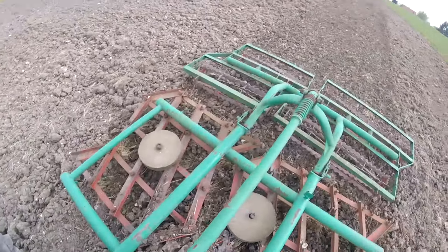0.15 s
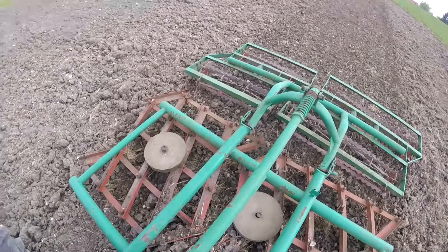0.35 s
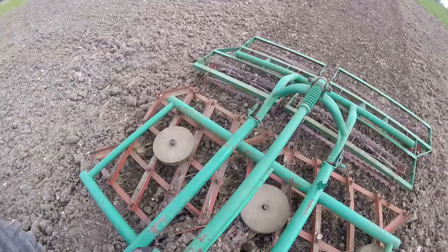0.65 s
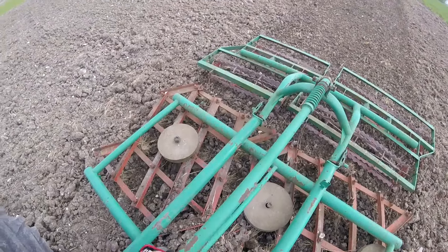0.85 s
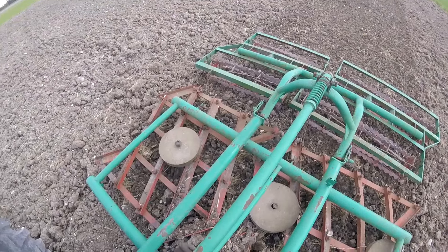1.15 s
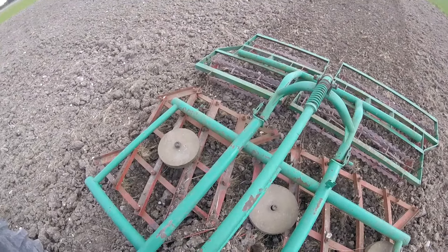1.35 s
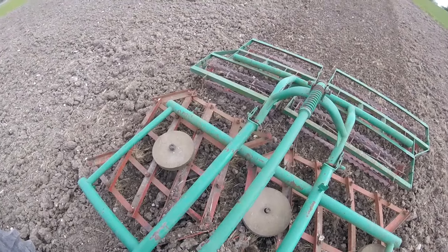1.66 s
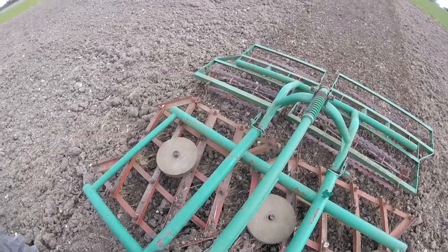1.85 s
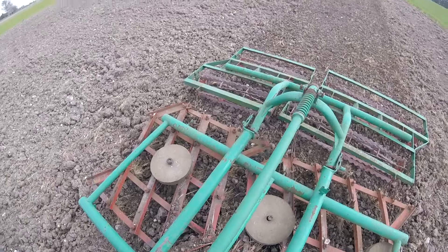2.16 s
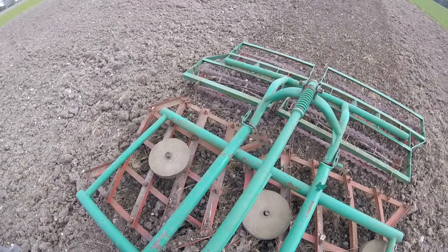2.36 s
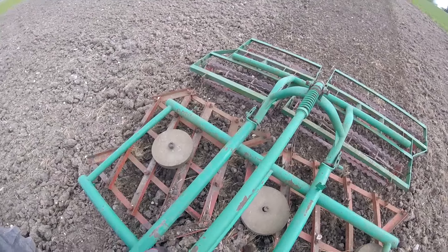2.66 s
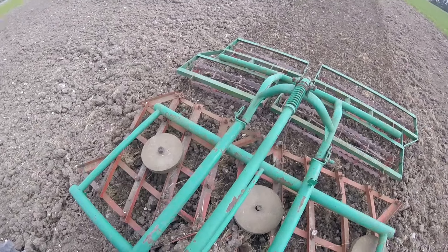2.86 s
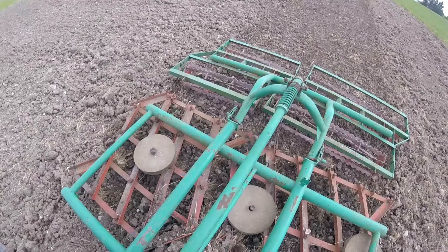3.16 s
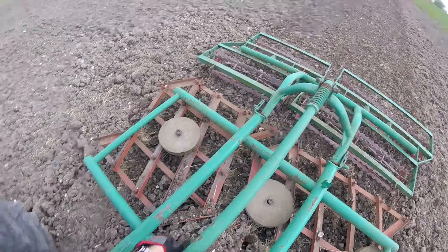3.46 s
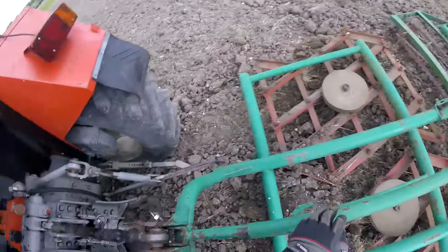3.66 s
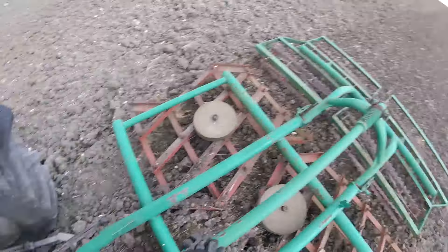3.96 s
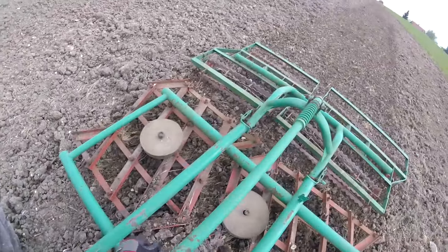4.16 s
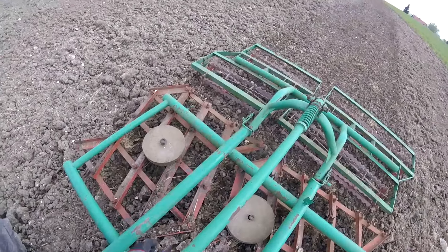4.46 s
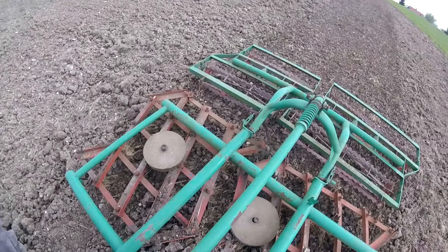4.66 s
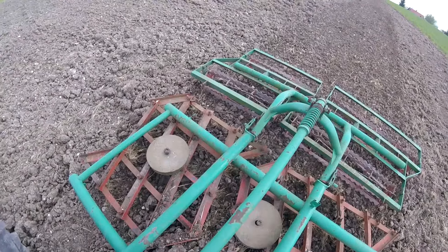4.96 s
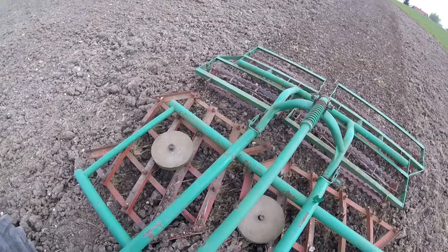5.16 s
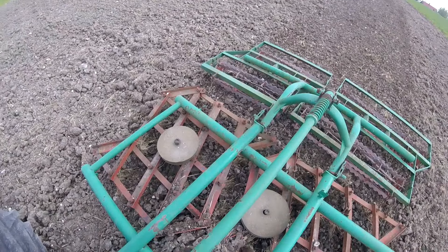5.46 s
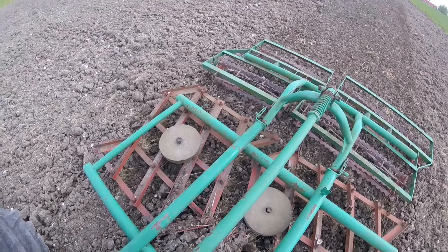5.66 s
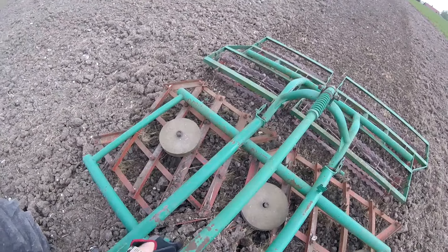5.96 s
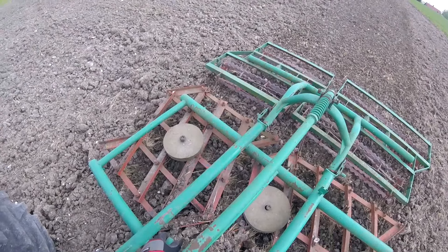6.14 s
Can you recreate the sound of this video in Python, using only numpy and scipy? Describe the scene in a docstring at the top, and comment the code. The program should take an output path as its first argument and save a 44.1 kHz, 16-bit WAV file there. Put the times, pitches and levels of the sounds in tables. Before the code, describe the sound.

Out in a field, a tractor's diesel idles with an even knocking while the cultivator behind it jolts again and again. Each jolt is a short, close burst of steel clanks, rattles and ringing bars, roughly a second apart, with lighter clinks in between. Wind rumbles on the small microphone the whole time and swells into irregular low thumps.

```python
"""Rattling cultivator beside an idling tractor

About once a second the steel frame of the cultivator lurches: loose parts hit each other
and its bars rattle and ring. Behind it the tractor's idling diesel knocks steadily, one
burst for each firing, and gusts of wind thump on the opening of a small microphone."""
import sys
import numpy as np
from scipy import signal
from scipy.fft import rfft, irfft
from scipy.io import wavfile

SR = 44100
rng = np.random.default_rng(int(sys.argv[2]) if len(sys.argv) > 2 else 0)


def waveform_to_disk(signal):
    """Save audio, clipped to [-1, 1], as 16-bit WAV at the path in sys.argv[1]."""
    frames = np.transpose(np.atleast_2d(signal))
    scaled = np.clip(frames, -1, 1) * 32767
    samples = np.round(scaled).astype(np.int16)
    wavfile.write(sys.argv[1], SR, samples)


N = 277874

# Lurches of the frame. A fade time, here and below, is how long a sound takes to drop by 60 dB.
# (start [s], lead-in [s], swell [s], hold [s], fade time [s], top level [dB], size of swell [dB],
#  boost for lower bars [dB], boost for beams [dB])
FRAME_LURCHES = [(0.507, 0.0088, 0.073, 0.023, 0.31, -18, 8.8, 0.5, -5),
                 (0.875, 0.0073, 0.0024, .003, 0.11, -34, 8, -26, 0),
                 (1.528, 0.1, 0.027, .13, 0.22, -29, 1, 1, 5),
                 (2.344, 0.05, 0.072, 0.0031, 0.21, -15.5, 14.7, 0, -2.5),
                 (3.252, 0.08, 0.0084, 0.15, 0.22, -26, -4.5, 1, 2),
                 (4.113, 0.052, 0.057, 0.0036, 0.18, -14, 15.3, -7, -2.5),
                 (5.051, 0.36, 0.061, 0.031, 0.17, -21.5, 18, 0.5, 4.5),
                 (5.83, 0.055, 0.026, 0.0099, 0.13, -12.5, 8.7, 2, -7)]
# Single steel clanks and two faint engine knocks: (time [s], level [dB], fade time [s], treble [dB])
SINGLE_HITS = [(0.16, -40, 0.12, 2), (0.5127, -10.5, 0.28, 8), (0.6071, -19, 0.88, -13),
               (0.7437, -17, .16, -5), (0.8737, -19, 0.13, 18), (0.942, -24, 0.29, 9),
               (1.1653, -36, 0.27, 9.5), (1.295, -29.5, 0.14, -1), (1.3715, -29.5, 0.67, 3),
               (1.4813, -21.5, .12, 1), (1.525, -12, 0.38, 3.5), (1.5527, -10.5, .15, 0),
               (1.635, -12, 0.31, -4), (1.6898, -15, 0.093, 13.5), (2.037, -36, .3, 12.5),
               (2.217, -28, .13, -1), (2.3419, -10.5, .29, 1), (2.4135, -6, 0.049, 0),
               (2.624, -30.5, 0.17, 8), (2.6823, -31, 0.14, 0), (3.063, -28.5, 0.31, 2),
               (3.2163, -24, 0.38, 7), (3.2452, -19, 0.13, 16), (3.2853, -7.5, 0.14, 9.5),
               (3.418, -15.5, 0.12, 21.5), (3.768, -37, 0.12, 0), (3.8488, -32, 0.3, -4),
               (4.0885, -16.5, 0.12, 2), (4.1173, -9.5, 0.14, -3), (4.156, -7, 0.17, 4),
               (4.3055, -19, 0.16, -8), (4.8012, -24.5, 0.15, -4), (5.0135, -24.5, 0.33, 3),
               (5.052, -14.5, 0.7, -7), (4.94, -31, .15, 0), (5.7082, -27, 0.29, -1),
               (5.7921, -15, 0.039, 1), (5.8319, -11.5, 0.35, 6.5), (6.1838, -42, 0.15, -2)]
# Tone colour of a blow on the frame: (frequency [Hz], level [dB])
FRAME_COLOUR = [(300, -3.5), (480, 1.5), (820, 3.5), (1340, 4), (2160, 2.5), (2830, 2), (3650, 1.5),
                (4150, -5), (4700, -1), (5400, 8.5), (6100, 0.5), (7200, -8), (8500, -19.5), (10700, -24),
                (11700, -35), (14300, -56)]
# Notes at which the bars ring: (frequency [Hz], level [dB], fade time [s])
BAR_NOTES = [(635, -4, .1), (820, -9, .08), (1550, -8, .1), (1814, -7, .15), (2010, -5, .2),
             (2208, -3, .18), (2481, -6, .18), (2743, -1, .25), (2969, -2, .32), (3139, -7, .3),
             (3334, -6, .35), (3585, -7, .15), (4684, -11, .25), (4880, -6, .12), (5071, -2, .15),
             (5206, -3, .15), (5272, -3, .15), (5336, -1, .15), (5436, -1, .12), (5580, -4, .12),
             (5831, -4, .15), (6450, -11, .15), (7180, -17, .12), (9240, -26, .12), (10600, -33, .06)]
# Short tones of a joint or a lone bar: (time [s], frequency [Hz], level [dB], rise [s], fade time [s])
JOINT_TONES = [(.545, 375, -32, .02, .1), (1.368, 2218, -24, .035, .12), (1.372, 4420, -42, .012, .07),
               (1.372, 6550, -42, .008, .07), (1.378, 13780, -60, .02, .07), (1.688, 6480, -30, .002, .22),
               (2.41, 1350, -25, .008, .1), (3.165, 2230, -43, .015, .08), (3.062, 5400, -40, .004, .12),
               (4.278, 832, -31, .02, .16), (4.8, 2970, -42, .004, .2), (4.95, 2970, -43, .03, .25),
               (5.772, 1380, -35, .012, .12)]
# Loudness of the diesel's knock: (time [s], level [dB])
ENGINE_LEVELS = [(0.0, -40.5), (0.74, -44), (1.14, -46.5), (1.49, -44.5), (3.09, -43), (3.4, -39),
                 (4.74, -42.5), (5.0, -40.5), (5.93, -42.5), (6.3, -44)]
# Tone colour of the engine block: (frequency [Hz], level [dB])
ENGINE_COLOUR = [(150, -8), (260, -8), (500, -7), (900, -12), (1700, -15), (2400, -23.5), (3200, -32.5),
                 (4200, -38.5), (5000, -36), (5600, -29.5), (6050, -43.5), (6450, -28), (7000, -41.5),
                 (9500, -49), (11000, -59), (14500, -56)]
# Steady wind on the microphone: (time [s], thump level [dB], brighter edge compared with thump [dB])
STEADY_WIND = [(0.0, -28, -13), (0.86, -37.5, -6), (1.24, -30, -4.5), (1.79, -29, -3), (2.23, -37, -9),
               (2.47, -30.5, -12), (2.81, -28.5, 1), (3.67, -34, -7), (4.09, -30.5, -4), (4.37, -31.5, -6),
               (5.05, -34, -12), (5.37, -28.5, -6.5), (6.16, -34, -1.5), (6.3, -35, -15)]
# Gusts on top of the steady wind: (time [s], boost [dB], width [s], extra boost for the edge [dB])
WIND_GUSTS = [(0.0, 9.5, 0.024, 1), (0.484, 9.5, 0.028, -2), (0.857, 6, 0.025, 7), (1.215, 6.5, 0.022, 0.5),
              (1.486, -2, 0.072, 11), (1.6, 11.5, 0.021, -18), (1.87, 9.5, 0.03, -4.5),
              (2.005, 12.5, 0.032, -2.5), (2.335, 11.5, 0.15, 9), (2.752, 5.5, 0.038, -5.5),
              (3, 6.5, 0.058, -7), (3.393, 9.5, 0.036, -5.5), (3.919, 10, 0.038, 3), (4.15, 5.5, 0.029, -2),
              (4.273, 9, 0.017, -6.5), (4.692, 13, 0.064, 2.5), (4.969, 14, 0.038, -6),
              (5.2, 11.5, 0.072, -3), (5.476, 8, 0.089, 3.5), (5.986, 15, 0.02, -6.5)]
# Tone colour of the wind: (frequency [Hz], level [dB])
WIND_COLOUR = [(7.1, -9.5), (12, -12), (37, -0.5), (60, 0), (135, -6), (209, -10.5), (308, -15), (500, -21),
               (650, -25), (1100, -120)]


def rattle(hits_per_s):
    """While the frame lurches, small bars, lower bars and beams take many tiny hits at random."""
    hits = rng.choice([-1, 1], N) * (rng.random(N) < hits_per_s / SR)
    hits = unit_level(hits) * from_db(1.5 * drift(45))
    small, lower, beams = np.zeros((3, N))
    for *shape, lower_db, beams_db in FRAME_LURCHES:
        level_db = lurch_db(*shape)
        small += from_db(level_db)
        swing_db = level_db + 25   # the bigger parts follow only a share of this swing
        lower += from_db(-31.5 + lower_db + 0.78 * swing_db)
        beams += from_db(-34.5 + beams_db + 0.94 * swing_db)
    low_hz, high_hz = 1000, 2600
    # the minus sign stops neighbouring bands from cancelling where they meet
    return (band(hits * small, "high", high_hz) - band(hits * lower, "band", (low_hz, high_hz))
            + band(hits * beams, "low", low_hz))


def lurch_db(start, lead_in, swell, hold, fade_s, top_db, swell_db):
    """The level of one lurch: it creeps in, swells, holds, then drops and leaves a longer jingle."""
    t = np.arange(N) / SR - start
    lead_in_db = 37.5 * np.minimum(t, 0) / lead_in
    below_top_db = swell_db * np.clip(1 - t / swell, 0, 1) ** 0.76
    drop_db = -60 * np.maximum(t - swell - hold, 0) / fade_s
    jingle, times_longer = from_db(-11), 2.57
    fall = (from_db(drop_db) + jingle * from_db(drop_db / times_longer)) / (1 + jingle)
    return top_db + lead_in_db - below_top_db + 20 * np.log10(fall + 1e-30)


def clanks(tick_db, bounce_db):
    """Each clank or knock is a tick, then bounces that die away, with its own amount of treble."""
    out = np.zeros(N)
    t = np.arange(SR // 4) / SR
    for start, level_db, fade_s, treble_db in SINGLE_HITS:
        clank = rng.standard_normal(len(t)) * from_db(level_db + bounce_db - 60 * t / fade_s)
        clank[0] = from_db(level_db + tick_db)
        clank += (from_db(treble_db) - 1) * band(clank, "band", (6430, 10000))
        at = round(start * SR)
        out[at:at + len(t)] += clank[:N - at]
    return out


def steel_frame(blows, ring_db):
    """Blows make the frame crack and set every bar ringing, each by its own changing amount."""
    out = coloured(blows, FRAME_COLOUR)
    shares = from_db(4 * drift(8))
    rubbing = from_db(3 * drift(40))   # loose bars touch as they ring, which roughens each note
    for hz, level_db, fade_s in BAR_NOTES:
        shift = rng.integers(N)   # so the notes do not waver together
        note = ring(blows * np.roll(shares, shift), hz, fade_s)
        out += from_db(level_db + ring_db) * np.roll(rubbing, shift) * note
    return out


def joint_tones():
    """A joint or a lone bar sings briefly: the tone swells, then fades, a little rough."""
    out = np.zeros(N)
    for start, hz, level_db, rise_s, fade_s in JOINT_TONES:
        t = np.maximum(np.arange(N) / SR - start, 0)
        rise = np.minimum(t / rise_s, 1)
        fall = from_db(level_db - 60 * np.maximum(t - rise_s, 0) / fade_s)
        out += rise * fall * np.sin(2 * np.pi * hz * t)
    return out * from_db(3 * drift(90))


def diesel(firings_per_s, sharpness, roar_db, hiss_db):
    """Each firing knocks through the block; the engine's steady roar, hiss and hum fill the gaps."""
    t = np.arange(N) / SR
    firings = 0.52 + firings_per_s * t + 0.033 * t ** 2   # the engine slowly gains speed
    number, progress = np.divmod(firings, 1)
    strength = from_db(1.8 * rng.standard_normal(200))[number.astype(int)]
    bursts = strength * np.minimum(progress / 0.41, 1) * np.exp(-sharpness * progress)
    hiss = band(rng.standard_normal(N), "high", 3500) * from_db(hiss_db + 2.5 * drift(20))
    pulsing_roar = rng.standard_normal(N) * (bursts + from_db(roar_db))
    knock = coloured(pulsing_roar + hiss, ENGINE_COLOUR)
    knock /= np.std(band(knock, "band", (500, 2000)))   # the middle frequencies set the level
    hum_hz = 309.4 + 2.37 * drift(3.74)
    hum = np.sin(2 * np.pi * np.cumsum(hum_hz) / SR) * from_db(-47 + drift(5.7))
    return from_db(over_time(ENGINE_LEVELS)[0]) * knock + hum


def wind(lumpy_db):
    """Swirls of air cross the microphone in lumps, making a low thump and its brighter edge."""
    t = np.arange(N) / SR
    thump_db, edge_db = over_time(STEADY_WIND)
    for middle, boost_db, width, edge_boost_db in WIND_GUSTS:
        gust = np.exp(-.5 * ((t - middle) / width) ** 2)
        thump_db += boost_db * gust
        edge_db += edge_boost_db * gust
    swirls = rng.standard_normal(N) * from_db(lumpy_db * drift(33))
    pressure = coloured(swirls, WIND_COLOUR)
    thump = unit_level(band(pressure, "low", 71.3))
    edge = unit_level(band(pressure, "band", (71.3, 480)))
    return from_db(thump_db) * (thump - from_db(edge_db) * edge)   # minus, as in the rattle


def from_db(db):
    """Turn decibels into a number to multiply by."""
    return 10 ** (np.asarray(db) / 20)


def unit_level(x):
    """Scale a signal so its average power is 1."""
    return x / np.sqrt(np.mean(x ** 2) + 1e-20)


def over_time(rows):
    """Join a table's points with straight lines: one curve for each column after the time."""
    times, *columns = np.transpose(rows)
    return [np.interp(np.arange(N) / SR, times, column) for column in columns]


def drift(hz):
    """A smooth random wobble of about size 1; a higher hz makes it quicker."""
    r = np.exp(-2 * np.pi * hz / SR)
    wobble = signal.lfilter([1], [1, -2 * r, r * r], rng.standard_normal(N + SR))
    return unit_level(wobble[SR:])


def coloured(x, colour):
    """Give a sound a tone colour; plain white noise keeps its power."""
    hz, level_db = np.transpose(colour)
    grid_hz = np.maximum(np.fft.rfftfreq(8192, 1 / SR), 1)
    gains = from_db(np.interp(np.log(grid_hz), np.log(hz), level_db))
    # fold the filter so that it sounds only after a hit, never before (minimum phase)
    folded = irfft(np.log(gains))
    folded[1:4096] *= 2
    folded[4097:] = 0
    response = irfft(np.exp(rfft(folded)))
    return signal.fftconvolve(x, response / np.linalg.norm(response))[:N]


def band(x, kind, hz):
    """Keep the lows, the highs or a band in between."""
    return signal.sosfilt(signal.butter(2, hz, kind, fs=SR, output="sos"), x)


def ring(x, hz, fade_s):
    """Every click in x starts a pure tone that dies away."""
    decay, angle = from_db(-60 / (fade_s * SR)), 2 * np.pi * hz / SR
    return signal.lfilter([0, np.sin(angle)], [1, -2 * decay * np.cos(angle), decay ** 2], x + 1e-18)


def scene():
    """Mix the cultivator, the engine and the wind into one channel."""
    blows = rattle(hits_per_s=2200) + clanks(tick_db=-7, bounce_db=-12.5)
    frame = steel_frame(blows, ring_db=-45.5)
    engine = diesel(firings_per_s=23.7, sharpness=1.8, roar_db=-14, hiss_db=-3)
    gusts = wind(lumpy_db=2.6)
    return (frame + joint_tones() + engine + gusts)[None]


def record(dry):
    """The microphone rounds off loud peaks and loses the highest treble."""
    rounded = .8 * np.tanh(dry / .8)
    return signal.sosfilt(signal.cheby2(10, 60, 14630, fs=SR, output="sos"), rounded)


dry = scene()
out = record(dry)
waveform_to_disk(out)
```